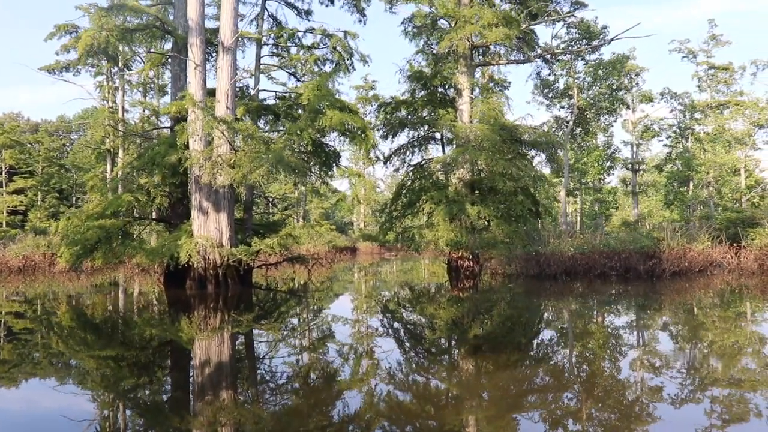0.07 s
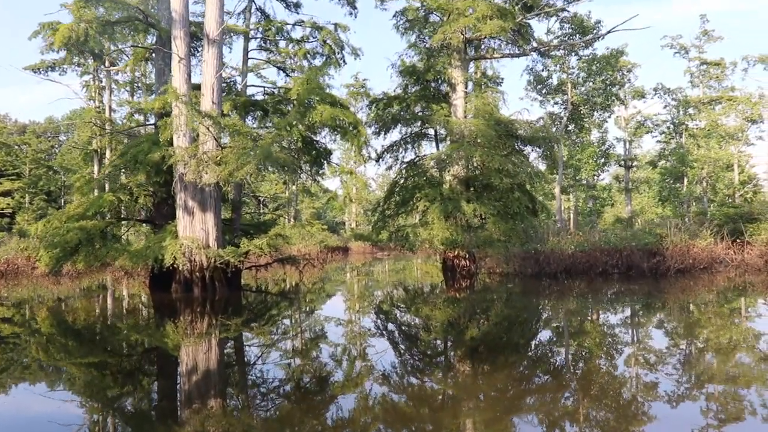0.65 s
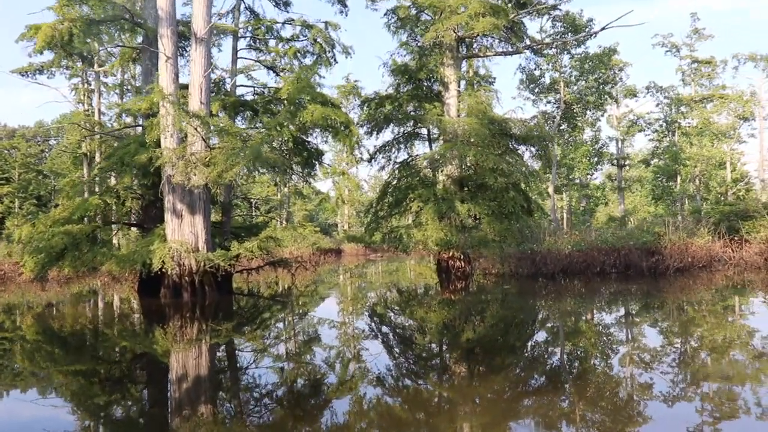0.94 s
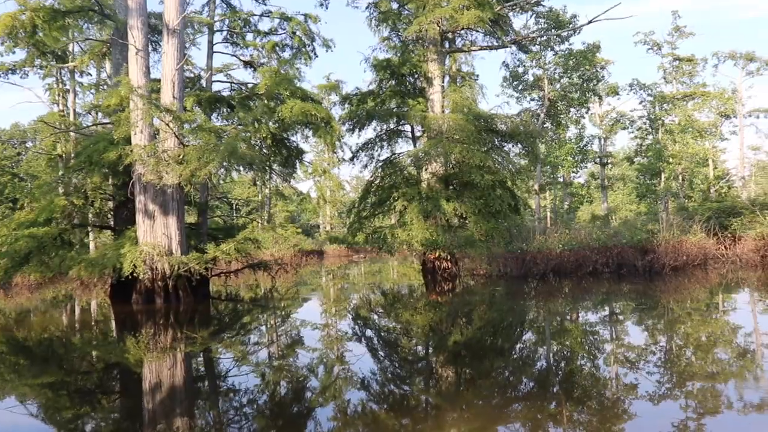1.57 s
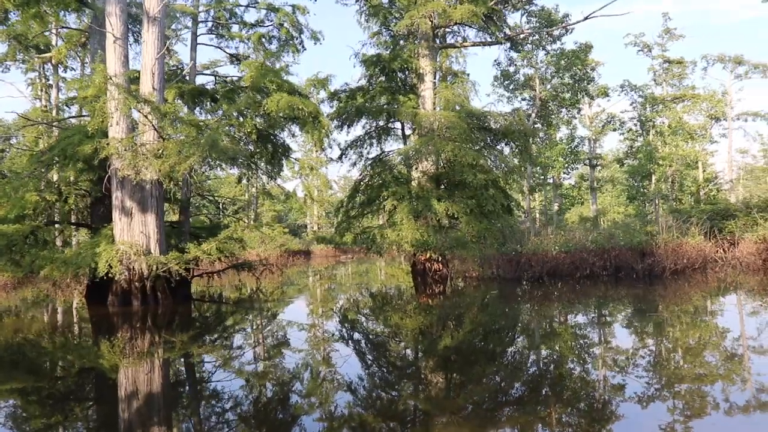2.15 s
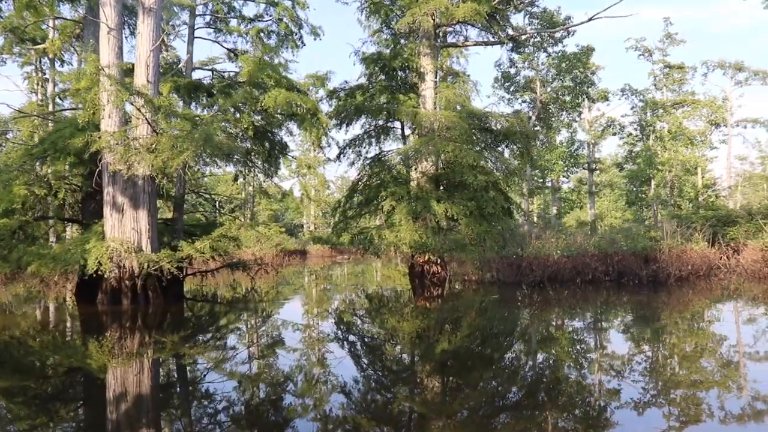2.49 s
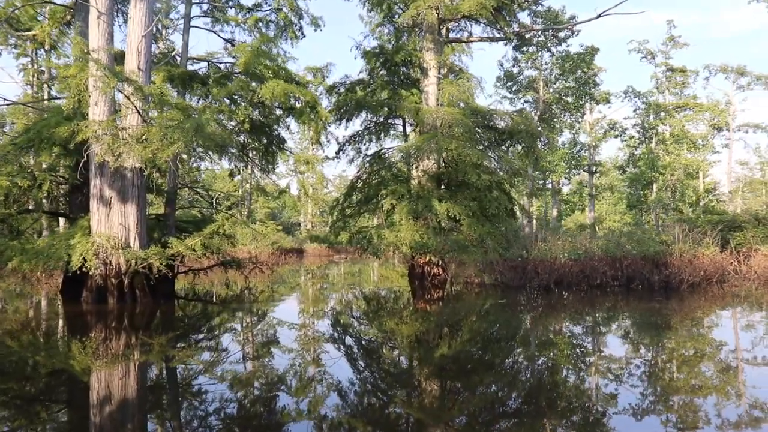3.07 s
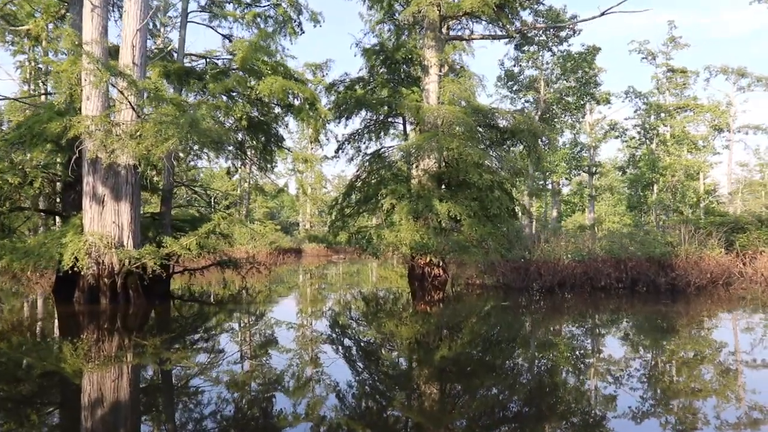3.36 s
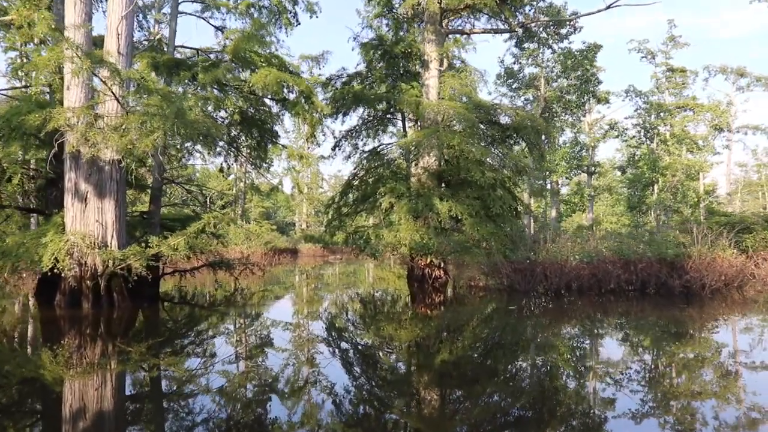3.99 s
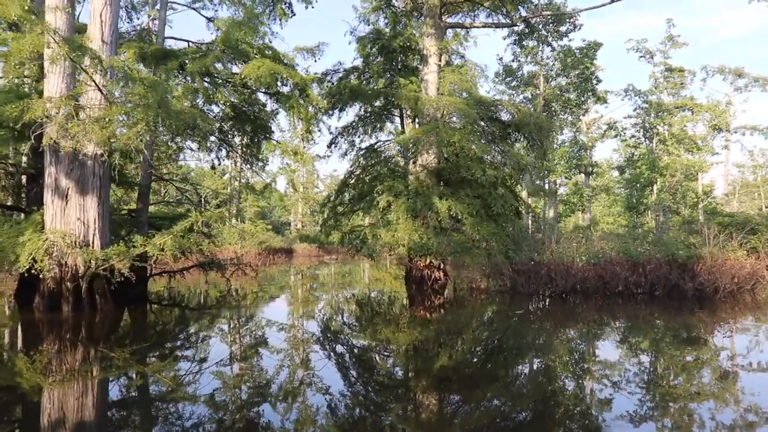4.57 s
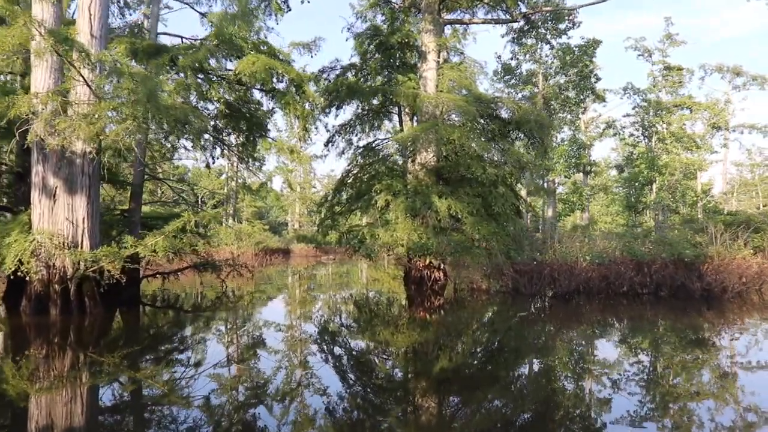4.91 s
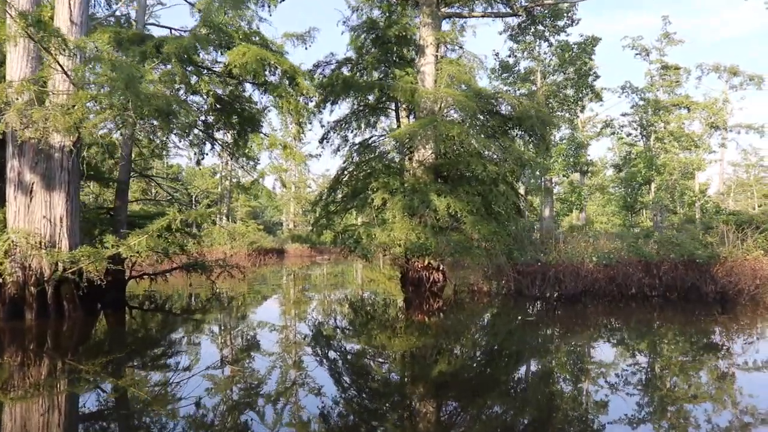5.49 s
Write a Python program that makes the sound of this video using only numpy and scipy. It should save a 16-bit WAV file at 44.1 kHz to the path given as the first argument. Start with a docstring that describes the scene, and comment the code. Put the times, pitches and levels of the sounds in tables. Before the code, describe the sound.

A hawk screams seven times as it flies off over a quiet swamp, while four drops plop into the water close by.

```python
"""Faint hiss, rustling and soft knocks open on a still, wooded swamp, with thin far trills and a low hum.
Then a hawk in flight screams "kee-ah" seven times, weakening as it flies off. Each scream is a clean high
whistle that cracks into a rasp and slides out an octave lower; the trees ahead throw it back a little
sharp. Midway through the screams four drops plop into the water close by, each a slap and a bubble."""
import sys
import numpy as np
from scipy import signal
from scipy.fft import rfft, irfft, next_fast_len
from scipy.io import wavfile
from scipy.ndimage import map_coordinates

SR = 44100
rng = np.random.default_rng(int(sys.argv[2]) if len(sys.argv) > 2 else 0)


def to_wav(sig):
    """Store sig (one row per channel, or 1-D mono) as 16-bit WAV at the path in sys.argv[1].

    Samples outside -1..1 are clipped; the rate is SR.
    """
    pcm = np.clip(np.atleast_2d(sig), -1, 1) * 32767
    pcm = np.round(pcm).astype(np.int16)
    wavfile.write(sys.argv[1], SR, pcm.T)  # frames by channels


N = 248812
T = np.arange(N) / SR
SHORT_T = np.arange(SR // 5) / SR  # time span of one scream or tick

# tone of the still air: freq_hz, gain_db
AIR_TONE = [(15, -49), (25, -8.5), (59, -8), (96, -4), (267, -10.5), (368, -13.5), (482, -15), (598, -15),
            (703, -18.5), (895, -18), (2010, -22), (3440, -24.5), (15500, -28.5)]
# bouts of close rustling: middle_s, spread_s, level_db
RUSTLE_BOUTS = [(.23, .22, -61.5), (1.24, .17, -60.5)]
# soft knocks and ticks: start_s, level_db, pitch_hz, width_hz, t60_s
SOFT_KNOCKS = [(.010, -47, 416, 300, .1), (.092, -45, 2510, 2000, .027), (.252, -42, 283, 200, .13),
               (.263, -50.5, 760, 300, .29), (.384, -38.5, 375, 220, .068), (.556, -37, 4200, 4500, .023),
               (.633, -44.5, 327, 300, .13), (1.059, -44.5, 2160, 3000, .082), (1.061, -46, 4350, 450, .1),
               (1.072, -44, 420, 200, .2), (1.112, -46.5, 570, 160, .18), (1.159, -39.5, 2460, 1100, .035),
               (1.458, -48.5, 2400, 1500, .04), (1.882, -43.5, 620, 220, .16), (2.750, -49, 583, 180, .36),
               (3.072, -41, 1010, 694, .054)]
# far songbird trills: start_s, length_s, pitch_hz, width_hz, level_db
BIRD_TRILLS = [(0.025, 0.26, 7200, 2400, -64.5), (0.607, 0.3, 5200, 1500, -62)]
# dips in the hum: middle_s, spread_s, depth_db
HUM_DIPS = [(1.65, .2, 6), (2.8, .35, 8)]
# the whistle's top harmonics, set against its third: harmonic_number, offset_db
WHISTLE_OVERTONES = [(4, -14), (5, -15.5), (6, -32)]
# resonance of the throat and open bill in the slide: freq_hz, gain_db
BILL_TONE = [(850, -21), (1200, -15), (1500, -5), (1900, -4), (2350, -4.5), (2900, -12.5), (3400, -2.5),
             (3950, 0), (4700, -6), (5400, -14), (6000, -15), (6700, -27.5), (7600, -25), (12000, -46)]
# the screams: start_s, whistle_s, rasp_s, top_hz, scoop_share, whistle_db, swell_db, slide_db,
# growl_share, beam_share (how much of the treble beam reaches the trees)
HAWK_SCREAMS = [(2.217, .036, .013, 2435, .017, -30.6, .5, -31.6, .45, .78),
                (2.740, .036, .015, 2465, .02, -33.2, -.5, -34, .36, .85),
                (3.2034, .043, .027, 2454, .06, -34.6, -.5, -35.2, .24, 1),
                (3.6942, .051, .017, 2390, .05, -36.5, .5, -34.8, .55, .95),
                (4.2438, .047, .020, 2429, .055, -41, 5, -37.2, .27, .7),
                (4.935, .046, .041, 2555, .023, -43.7, -4, -43.7, .85, .8),
                (5.5103, .035, .024, 2418, .03, -43.8, 2, -43, .8, .33)]
# treble that the bill beams ahead of the bird, at full strength: freq_hz, gain_db
TREBLE_BEAM = [(1200, -3), (2400, -2.5), (3700, -9), (4500, 0), (5050, 6), (6000, 0), (7000, 7.5),
               (7580, 16.5), (8400, 9), (9300, 16), (10050, 21), (12500, 7)]
# echo sends to the woods: ahead_share (0 behind the bird, 1 ahead of it), send_db
WOODS_SENDS = [(0, -5), (0.502, -5.5), (1, -5.7)]
# drops on the water: start_s, slap_db, bubble_db, bubble_hz
WATER_DROPS = [(3.6865, -19.3, -25.5, 1067), (3.7923, -23, -52, 700), (3.8357, -14.5, -17.4, 1110),
               (3.9743, -27.5, -39.5, 970)]

FULL_VOICE_DB = -31  # weak_db is how far a whistle falls below this
DOPPLER = .035  # share by which the echo from ahead is sharp


def undb(db):
    """Decibels to gain."""
    return 10 ** (np.asarray(db) / 20)


def unit(x):
    """Scale to an rms of one."""
    return x / np.sqrt(np.mean(x ** 2) + 1e-18)


def colour(x, points):
    """EQ through (freq_hz, gain_db) points, joined on a log-frequency axis."""
    size = next_fast_len(2 * len(x))
    hz, db = np.transpose(points)
    log_hz = np.log(np.maximum(np.fft.rfftfreq(size, 1 / SR), 1))
    return irfft(rfft(x, size) * undb(np.interp(log_hz, np.log(hz), db)), size)[:len(x)]


def band(size, hz, width_hz):
    """Noise in one steep resonance, rms one."""
    n = next_fast_len(size, real=True)
    f = np.fft.rfftfreq(n, 1 / SR) + 1e-3
    detuning = (f * f - hz * hz) / (f * width_hz)
    return unit(irfft(rfft(rng.standard_normal(n)) / (1 + detuning ** 2), n)[:size])


def wander(size, hz):
    """Smooth random motion up to about hz, rms one."""
    n = next_fast_len(size, real=True)
    f = np.fft.rfftfreq(n, 1 / SR)
    return unit(irfft(rfft(rng.standard_normal(n)) * np.exp(-.5 * (f / hz) ** 2), n)[:size])


def ramp(t, length):
    """Smooth fade from 0 to 1."""
    return np.sin(np.pi / 2 * np.clip(t / length, 0, 1)) ** 2


def decay(t, t60):
    """A tail that falls 60 dB in t60 seconds."""
    return np.exp(-np.log(1000) * t / t60)


def bump(middle_s, spread_s):
    """A bell-shaped swell on the scene's timeline."""
    return np.exp(-((T - middle_s) / spread_s) ** 2 / 2)


def add(track, start_s, x):
    """Mix x into the track at start_s."""
    i = max(int(start_s * SR), 0)
    track[i:i + len(x)] += x[:max(len(track) - i, 0)]


def still_air(hiss_db=-54.83, side_db=-76, wash_db=-73, wash_db_per_s=1.7):
    """The bed: even hiss, a faint mid-range wash that slowly grows louder, a little width in the bass."""
    wash = band(N, 1220, 3550) * undb(wash_db + wash_db_per_s * T + 2.44 * wander(N, 25))
    hiss = unit(colour(rng.standard_normal(N), AIR_TONE)) * undb(hiss_db)
    side = colour(rng.standard_normal(N), [(25, 3), (100, 0), (600, -7), (1500, -31.5), (12000, -43)])
    return wash + hiss + unit(side) * undb(side_db) * np.array([[1], [-1]])


def rustle(ticks_per_s=80, low_hz=450, high_hz=2800, brush_db=-2):
    """Soft brushing with a patter of tiny ticks, deep and high; each bout swells and fades."""
    out, t = np.zeros(N), SHORT_T
    for middle, spread, db in RUSTLE_BOUTS:
        ticks = np.zeros(N)
        for when, pitch, size in rng.uniform(-1, 1, (int(ticks_per_s * 4 * spread), 3)):
            hz = low_hz * (high_hz / low_hz) ** ((pitch + 1) / 2)
            tick = band(len(t), hz, .3 * hz) * ramp(t, .001) * decay(t, t60=.05)
            add(ticks, middle + 2 * when * spread, undb(4.5 + 3.5 * size) * tick)
        brush = undb(brush_db) * band(N, 1220, 3550)
        out += undb(db) * bump(middle, spread) * (ticks + brush)
    return out


def knocks(trim_db=-4):
    """Light blows, each dying away in one damped resonance."""
    out, t = np.zeros(N), np.arange(SR // 4) / SR
    for start, db, hz, width, t60 in SOFT_KNOCKS:
        add(out, start, undb(db + trim_db) * band(len(t), hz, width) * ramp(t, .0021) * decay(t, t60))
    return out


def woods(x, near_db=-4, near_t60=.43, far_db=-10, far_t60=1.82, absorb_hz=4500, patchy_db=5):
    """Reverb: scattered echoes off near trunks, then a long, darker wash from the far tree line."""
    t = np.arange(int(1.4 * SR)) / SR
    scatter = rng.standard_normal(len(t)) * undb(patchy_db * np.tanh(wander(len(t), 110)))
    near = scatter * ramp(t - .006, .021) * decay(t, near_t60)
    far = scatter * ramp(t - .02, .14) * decay(t, far_t60)
    far = signal.sosfilt(signal.butter(1, absorb_hz, fs=SR, output="sos"), far / np.linalg.norm(far))
    return signal.fftconvolve(x, undb(near_db) * near / np.linalg.norm(near) + undb(far_db) * far)[:N]


def songbirds():
    """Far trills, blurred by the trees into a thin fizz."""
    out = np.zeros(N)
    for start, length, hz, width, db in BIRD_TRILLS:
        n = int(length * SR)
        add(out, start, undb(db) * band(n, hz, width) * signal.windows.tukey(n, .5))
    return out


def far_hum(start_s=.36, level_db=-58.7, pitch_hz=99.6, width_hz=12):
    """A low, wavering hum that fades in and holds, dipping twice."""
    dip_db = sum(depth_db * bump(middle, spread) for middle, spread, depth_db in HUM_DIPS)
    return band(N, pitch_hz, width_hz) * undb(level_db - dip_db) * ramp(T - start_s, .1)


def whistle(length, top_hz, scoop, db, swell_db, crest=.264, second_db=-3.8, third_db=-11.3):
    """The 'kee': a clean tone that starts with a scrape, scoops up to its crest and droops."""
    t, weak_db = SHORT_T, FULL_VOICE_DB - db
    progress = np.minimum(t / length, 1)
    rise = np.clip(1 - progress / crest, 0, 1)
    fall = np.maximum(progress - crest, 0) / (1 - crest)
    scrape = np.exp(-t / .0035)
    # weak screams droop less, and are shakier and rougher
    droop = .083 - .0038 * weak_db
    flutter = .004 + .0002 * weak_db + .045 * scrape
    roughness = .09 + .014 * weak_db + .5 * scrape
    hz = top_hz * (1 - scoop * rise ** 2 - droop * fall ** 1.443) * (1 + flutter * wander(len(t), 660))
    phase = 2 * np.pi * np.cumsum(hz) / SR
    partials = [(2, second_db), (3, third_db), (3 / 2, -31)]
    partials += [(k, third_db + offset_db) for k, offset_db in WHISTLE_OVERTONES]
    upper = sum(undb(partial_db) * np.sin(k * phase) for k, partial_db in partials)
    upper *= undb(4 * (progress - .5) - 7 * scrape)  # harmonics build as the bill opens
    upper *= undb(.028 * (2440 - top_hz))  # higher screams are duller
    tone = (np.sin(phase) + upper) * (1 + roughness * wander(len(t), 400))
    tone += undb(-10) * scrape * band(len(t), 3300, 2200)
    gate = ramp(t, .0021) * ramp(length + .0035 - t, .0072)
    return np.sqrt(2) * undb(db + swell_db * (progress - .5)) * tone * gate


def slide(rasp_s, glide_s, db, growl, weak_db, rasp_hz=1185, clear_hz=1368, rasp_db=-1, fade_db=17):
    """The 'ah': the voice drops an octave, rattles chaotically, then clears and glides down."""
    t, n, end = SHORT_T, len(SHORT_T), rasp_s + glide_s
    progress = np.clip((t - rasp_s) / glide_s, 0, 1)
    rough = 1 - ramp(t - rasp_s + .00523, .01)
    last_hz = 992 + 8.5 * weak_db  # weak screams stop higher
    climb_hz = rasp_hz + (clear_hz - rasp_hz) * (t / rasp_s) ** 2.615
    glide_hz = clear_hz + (last_hz - clear_hz) * progress ** .68
    flutter = .009 + .055 * rough * ramp(t + .003, .012)
    hz = np.where(t < rasp_s, climb_hz, glide_hz) * (1 + flutter * wander(n, 503))
    phase = 2 * np.pi * np.cumsum(hz) / SR
    pulses = sum(np.cos(k * phase) for k in range(1, 11))
    pulses -= .44 * rough * np.cos(phase)  # the low note only takes hold as the rattle clears
    pulses *= 1 + (.17 + .33 * rough) * wander(n, 750)  # hoarseness
    # growl: alternate strong and weak cycles add a partial at 1.5 times the pitch
    growl_depth = 2 * growl * (.4 * rough + (1 - progress) ** 2.5)
    pulses += growl_depth * np.cos(3 / 2 * phase) * (.71 + .5 * wander(n, 200))
    voice = colour(pulses, BILL_TONE)
    voice *= undb(db + rough * rasp_db - (1 - rough) * fade_db * progress) / np.std(voice[t < end])
    # the harmonics die first and leave the bare fundamental, more exposed in weak screams
    bare = undb(db - 10.5 + .25 * weak_db) * np.cos(phase)
    bare *= ramp(progress, .17) * ramp(1.2 - progress, .87)
    return (voice + bare) * ramp(t + .0015, .3 * rasp_s) * ramp(end - t, .0038)


def thrown(scream, ahead, beam):
    """The bird flies away, so the trees ahead of it get a higher and brighter scream."""
    shifted = map_coordinates(scream, [np.arange(len(scream)) * (1 + DOPPLER * ahead)])
    return colour(shifted, [(hz, ahead * beam * db) for hz, db in TREBLE_BEAM])


def hawk(tree_passed_s=5.22, tree_db=-16):
    """The screams with one big tree's slapback, plus a send to the woods in each direction."""
    direct, sends = np.zeros(N), np.zeros((len(WOODS_SENDS), N))
    for start, whistle_s, rasp_s, top_hz, scoop, kee_db, swell_db, ah_db, growl, beam in HAWK_SCREAMS:
        weak_db = FULL_VOICE_DB - kee_db
        scream = whistle(whistle_s, top_hz, scoop, kee_db, swell_db)
        add(scream, whistle_s - .001, slide(rasp_s, 1.75 * whistle_s, ah_db, growl, weak_db))
        add(direct, start, scream)
        for send, (ahead, send_db) in zip(sends, WOODS_SENDS):
            # the farther and weaker the scream, the wetter it is
            add(send, start, undb(send_db + .42 * weak_db) * thrown(scream, ahead, beam))
        if start < tree_passed_s:  # the slapback tightens until the bird passes the tree
            delay_s = DOPPLER * (tree_passed_s - start)
            add(direct, start + delay_s, undb(tree_db) * thrown(scream, 1, beam))
    return direct, sends


def plops(rise_per_s=75, ring_s=.0036, slap_hz=300, slap_s=.0012, push_db=-15, push_s=.0035):
    """Each drop pushes the air aside, slaps the surface and traps a bubble whose pitch shoots up."""
    out, t = np.zeros(N), np.arange(SR // 30) / SR
    for start, slap_db, bubble_db, hz in WATER_DROPS:
        push = undb(slap_db + push_db) * np.sin(np.pi * np.minimum(t / push_s, 1))
        slap = undb(slap_db) * np.cos(2 * np.pi * slap_hz * t) * np.exp(-t / slap_s)
        bubble = np.sin(2 * np.pi * hz * (t + rise_per_s * t ** 2 / 2)) * np.exp(-t / ring_s)
        add(out, start - push_s, push)
        add(out, start, -(slap + undb(bubble_db) * bubble) * ramp(t, .0003))
    return out


def scene():
    """The mix: hawk and echoes dead centre, small sounds close and nearly dry, the quiet bed beneath."""
    screams, sends = hawk()
    close = knocks() + plops()
    echoes = sum(woods(send) for send in sends) + undb(-18.5) * woods(close)
    return screams + close + echoes + songbirds() + far_hum() + still_air() + rustle()


def record(dry, top_hz=15800):
    """A steep high cut on the whole mix."""
    return signal.sosfilt(signal.ellip(10, .1, 70, top_hz, fs=SR, output="sos"), dry)


dry = scene()
out = record(dry)
to_wav(out)
```